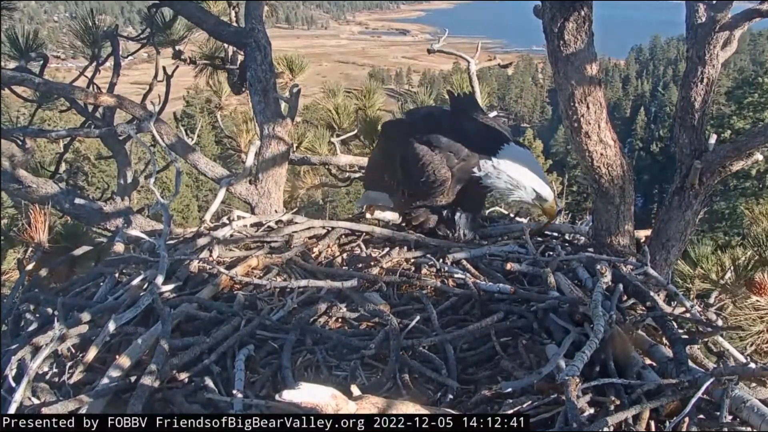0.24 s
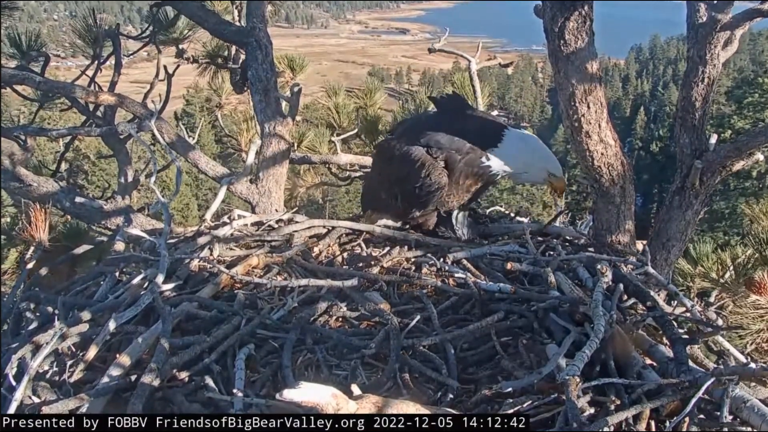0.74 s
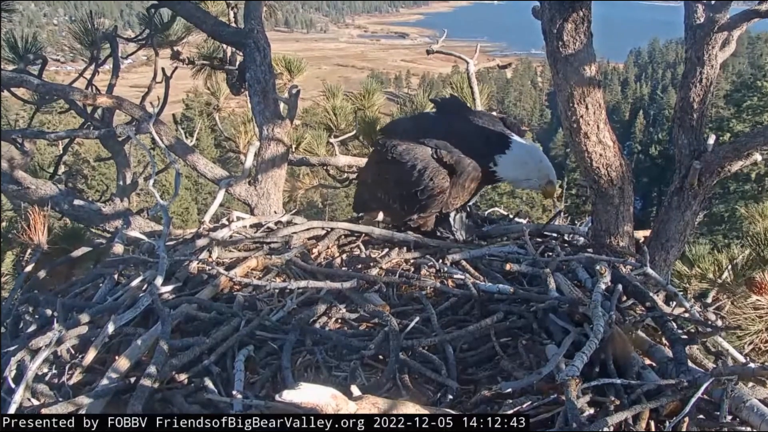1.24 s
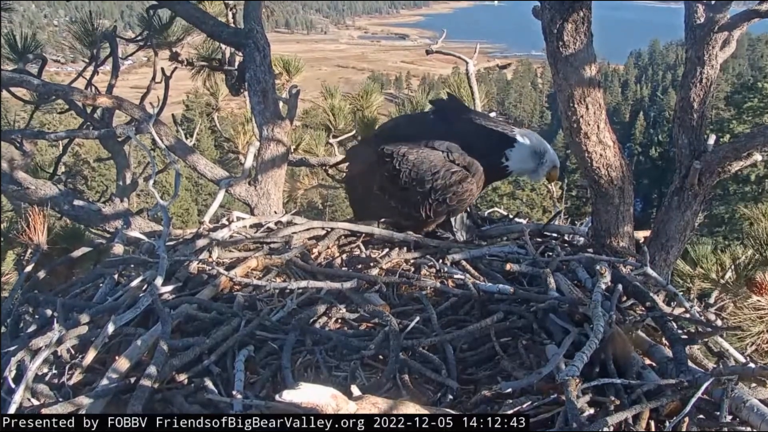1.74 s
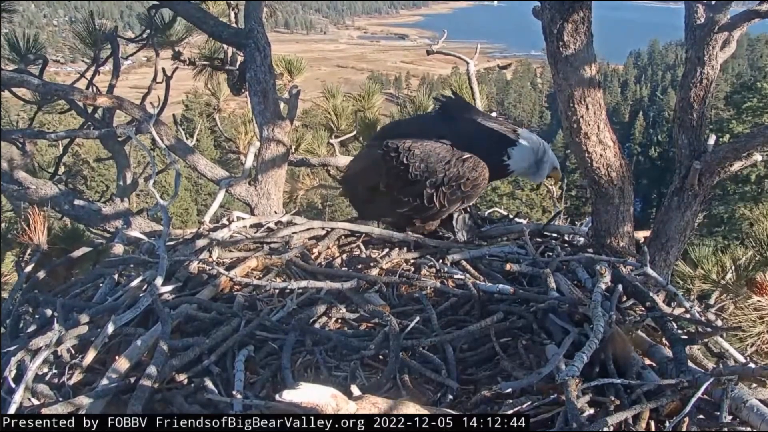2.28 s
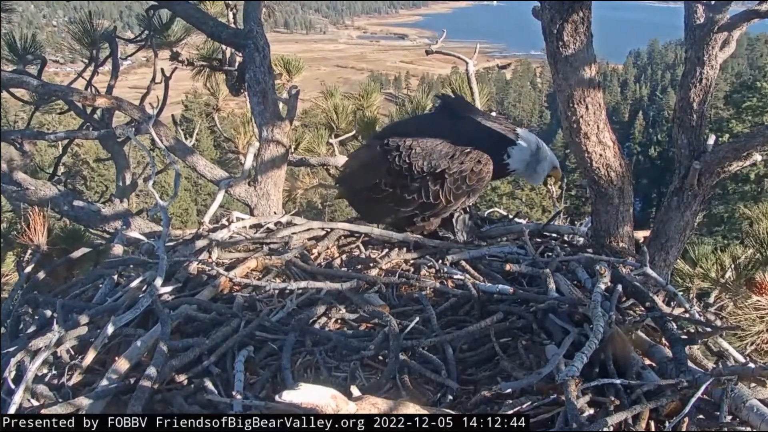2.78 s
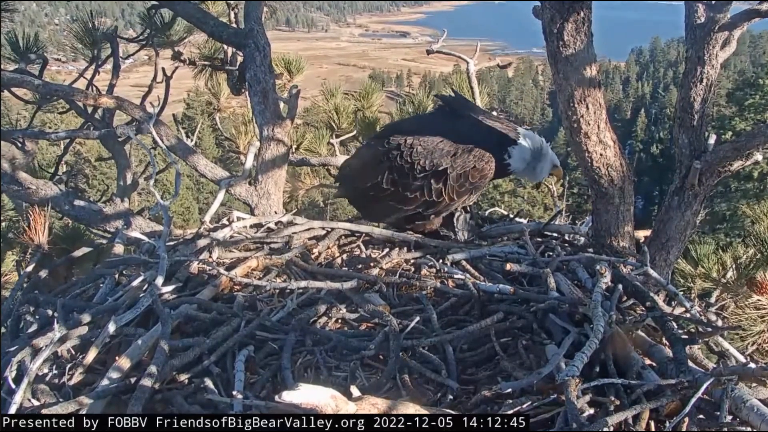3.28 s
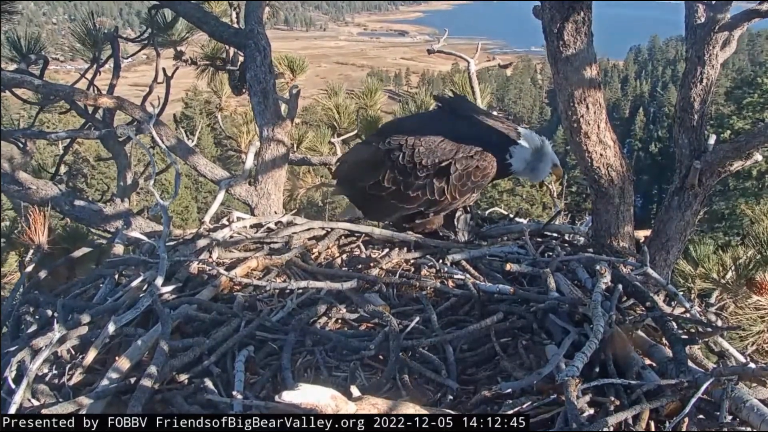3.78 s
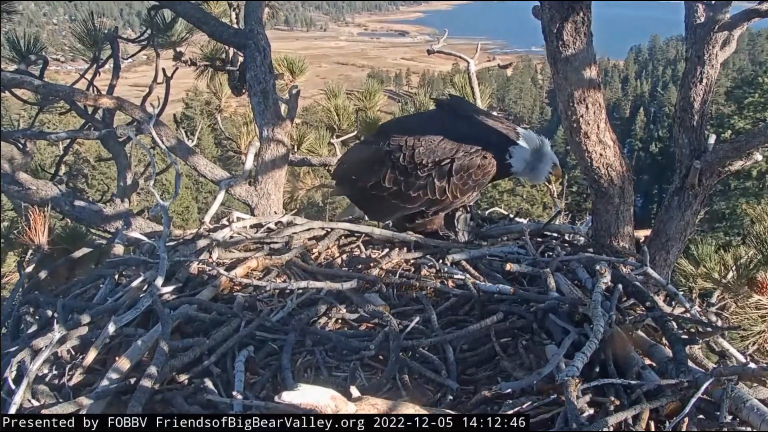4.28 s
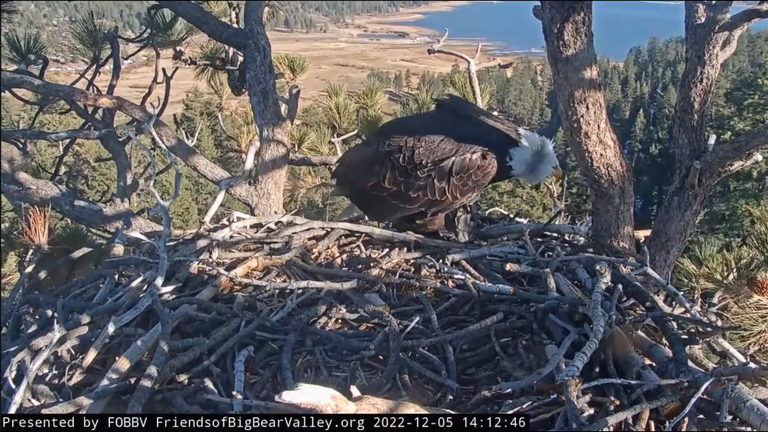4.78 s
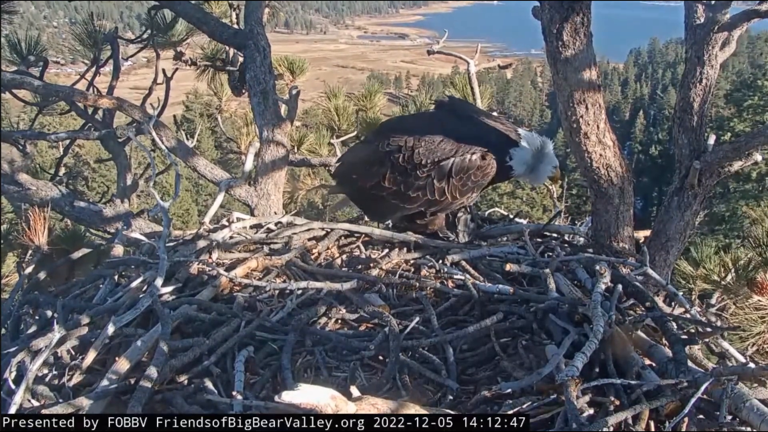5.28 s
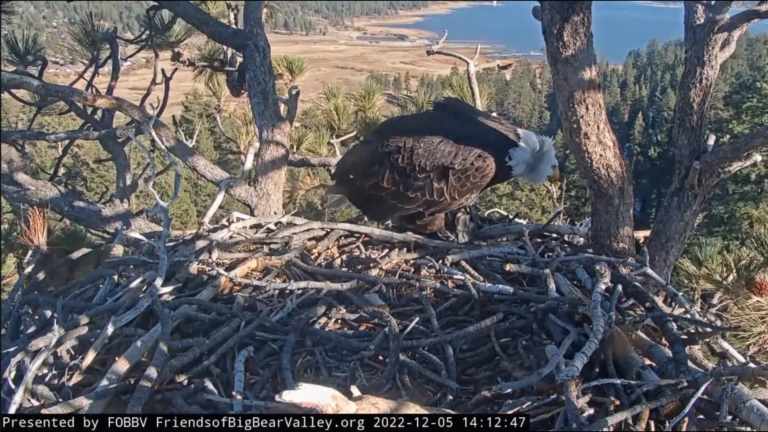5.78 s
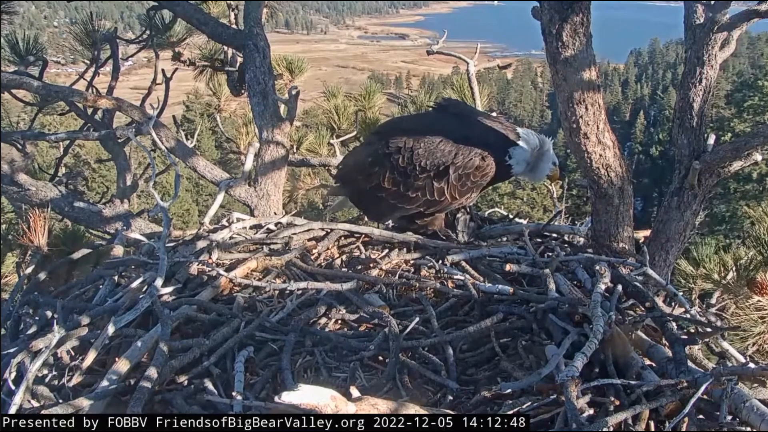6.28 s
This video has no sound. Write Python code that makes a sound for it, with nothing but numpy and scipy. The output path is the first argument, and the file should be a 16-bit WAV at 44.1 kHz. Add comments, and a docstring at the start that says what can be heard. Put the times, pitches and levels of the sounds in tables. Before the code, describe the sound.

A close mono outdoor pickup of an eagle on its nest of dry sticks, with even breeze hiss and soft low wind rumble throughout. From about 0.2 to 0.5 seconds a thin hoarse whistle rises and falls, catching into brief bright peals. Two faint twig ticks come near 0.75. More chirps follow at 1.0, 1.5, 1.9 and 2.15 seconds, arching high, with loud, nearly pure, piercing peals. At 2.2 a low reedy croak buzzes for a third of a second and opens into the first scream at 2.5, roughened by squeals. Further screams come at 3.2, 3.9 and 4.65, each about 0.3 seconds, introduced by a short croak, climbing slightly, then cracking to half its pitch. Loud calls overload slightly and echo among the trees. After 5 seconds the echo fades; light twig clicks and rustling increase between 5.3 and 6.5.

```python
"""Thin whistled chirps over a light breeze, some catching into loud peals: an eagle on its nest in a tall pine.
Four screams follow, each opening on a low croak and cracking to half its pitch at the end.
The voice is a rough, phase-shaken stack of harmonics; sparse and dense reflections make the forest's echo.
Breeze is shaped noise, nest twigs are struck resonances, and the close mono microphone overloads on the calls."""
import sys
import numpy as np
from scipy import signal
from scipy.fft import rfft, irfft, next_fast_len
from scipy.io import wavfile
from scipy.ndimage import uniform_filter1d

SR = 44100
rng = np.random.default_rng(int(sys.argv[2]) if len(sys.argv) > 2 else 0)


def wrap_up_sound(samples):
    """Save the sound to the file named by the first command line argument, as 16-bit audio."""
    columns = np.atleast_2d(samples).T
    # keep every value between -1 and 1, then stretch to whole-number steps
    tamed = np.clip(columns, -1, 1)
    steps = np.round(tamed * 32767).astype(np.int16)
    wavfile.write(sys.argv[1], SR, steps)


N = 288149
TIME = np.arange(N) / SR

# Screams: t/s, length/s, first f/Hz, last f/Hz, lateness of the climb (power), level/dB, crack level/dB;
# pitch before the final lift, levels before the tone of the voice
SCREAMS = [(2.524, .24, 1806, 1963, 1.53, -1, -23.5), (3.184, .251, 1793, 1966, 1.24, -0.5, -4),
           (3.9, .304, 1806, 1958, 1.65, -0.5, -9.5), (4.649, 0.31, 1798, 1978, 1.214, -1.5, -2)]
# How well a scream's fundamental, then its octave, carries: f/Hz, level/dB
FUNDAMENTAL_CARRY = [(1790, -11), (1810, -7), (1835, -0.5), (1875, -16), (1905, 6), (1945, 4.5),
                     (2000, 11.5)]
OCTAVE_CARRY = [(3580, -13.5), (3630, -15), (3660, 1), (3760, -4.5), (3815, 1), (3880, -5.5), (3970, 2.5)]
# Last upward push before a scream cracks
SCREAM_LIFT_HZ, SCREAM_LIFT_S = 20, 0.016

# Squeals from the other side of the syrinx, beating against a scream:
# t/s, length/s, first f/Hz, middle f/Hz, last f/Hz, level/dB before tone
SQUEALS = [(2.563, 0.034, 3980, 3900, 3837, -6.5), (2.664, 0.025, 3400, 3300, 3284, -8),
           (2.697, .016, 4000, 3660, 3620, -6.5)]
# Squeal harmonics: number, level/dB
SQUEAL_TONE = [(1, -2.5), (2, -48)]

# Crack harmonics: number, level/dB
CRACK_TONE = [(1, -60), (2, -17), (3, 0.5), (4, -25.5), (5, -34), (6, -17)]
# A crack holds near half the scream's pitch, sagging slightly, then sinks and fades
CRACK_HOLD_S, CRACK_SINK_S = 0.028, 0.029
CRACK_SAG_HZ_PER_S, CRACK_SINK_HZ, CRACK_FADE_DB = 400, 94.9, -23.5

# Croaks: t/s, length/s, first f/Hz, middle f/Hz, last f/Hz, level/dB; before the sag and the throat
CROAKS = [(2.18, .352, 1166, 1214, 1282, -10), (3.026, .025, 1285, 1250, 1181, -19),
          (3.092, .1, 1212, 1255, 1282, -14), (3.814, .093, 1248, 1275, 1270, -12),
          (4.583, .073, 1245, 1274, 1264, -12)]
# Throat resonances during a croak: f/Hz, level/dB
CROAK_THROAT = [(1180, -11), (1280, -4), (2360, -5), (2460, -2.5), (2560, -6), (3550, -10), (3700, -4.5),
                (3850, -9), (4800, -25), (5100, -27.5), (6050, -33), (6400, -38.5), (7400, -46.5),
                (8700, -64.5)]
CROAK_SCOOP_HZ = 25  # the pitch sags at both ends of a croak

# Loud pure peals, where a chirp catches on the throat:
# t/s, length/s, first f/Hz, middle f/Hz, last f/Hz, level/dB before tone
PEALS = [(.204, .015, 3230, 3420, 3370, -11), (.432, 0.029, 3860, 3600, 3506, 2),
         (.459, .012, 3500, 3680, 3480, -7), (1.04, 0.091, 3590, 3990, 3730, 1),
         (1.486, 0.016, 3540, 3610, 3820, -6.5), (1.523, 0.06, 3820, 4040, 4187, 2.5),
         (1.618, 0.0098, 4000, 3700, 3690, 0.5), (1.632, 0.0094, 3700, 3740, 3560, -4.5),
         (1.909, .02, 3590, 3690, 3937, 0.5), (1.94, 0.032, 4200, 4060, 4187, 1),
         (2.028, 0.015, 3880, 3840, 3760, -1.5), (2.166, 0.055, 3150, 3320, 3170, 5)]
# Peal harmonics: number, level/dB
PEAL_TONE = [(1, -1.5), (2, -24.5), (3, -59.5)]

# Chirps, thin whistled arches: t/s, rise/s, hold/s, fall/s, top f/Hz,
# slope level/dB, top level/dB, overtone level/dB; levels before the tone of the voice
CHIRPS = [ (0.184, .212, .028, .055, 5050, -20, -32, -26), (.99, 0.048, 0.082, .033, 4097, -17, -13, -28.5),
          (1.487, .091, .025, 0.039, 5180, -22, -20.5, -50),
          (1.907, .068, 0.036, 0.044, 5270, -20, -13.5, -54),
          (2.155, 0.0072, 0.02, .055, 3754, -12.5, -4, -34.5)]
CHIRP_FIRST_HZ, CHIRP_LAST_HZ = 3480, 3165
# A rising chirp is hoarse up to this pitch, at this share of the rise, then clears
CHIRP_BREAK_HZ, CHIRP_BREAK_SHARE = 4550, 0.75

# Soft creaks as the voice starts or stops: t/s, length/s, first f/Hz, last f/Hz, level/dB before tone
CREAKS = [(0.169, 0.031, 1800, 1960, -23), (.987, 0.019, 1895, 2013, -25),
          (1.476, 0.014, 1938, 2090, -25.5), (1.899, 0.013, 1972, 2157, -26),
          (2.14, 0.02, 1805, 2096, -25.5), (2.769, 0.032, 1913, 1629, -16),
          (3.494, 0.0083, 1777, 1567, -18.5), (4.249, 0.016, 1812, 1563, -20.5),
          (5.015, 0.013, 1807, 1593, -17)]
# Creak harmonics: number, level/dB
CREAK_TONE = [(1, -2.5), (2, -7), (3, -27.5), (4, -44)]

# Reflections from the nest and the trunks: delay t/s, level/dB
REFLECTIONS = [(.0043, -40), (.0091, -22.5), (0.015, -15.5)]
# Scatter from the forest all around, relative colour: f/Hz, level/dB
ECHO_COLOUR = [(1000, -7), (2000, -6.5), (3000, 5.5), (3800, 2.5), (5200, -4), (8000, -11.5),
               (12000, -26.5)]
# Its relative course: t after the call/s, level/dB
ECHO_COURSE = [(.01, 24), (.06, 2), (.14, -8.5), (.27, -8.5), (.4, -6.5), (.55, -17.5), (.8, -27),
               (1.3, -70.5)]
# Brighter answer of a far stand of trees, relative colour: f/Hz, level/dB
FAR_COLOUR = [(1000, -36), (2000, -9), (3000, -1), (3900, 5.5), (5200, 8), (6000, -12), (8000, -8),
              (11000, -9)]
# Its relative course: t after the call/s, level/dB
FAR_COURSE = [(.15, -62), (.21, -9.5), (0.239, -4), (.27, -15.5), (.3, -6.5), (.38, -54)]
ECHO_DB, FAR_DB = -24, -34

# Twig ticks: t/s, strength of the burst level/dB, before TWIG_DB and the resonances
TWIGS = [(0.7264, -29), (0.795, -25.5), (5.1219, -42), (5.2976, -19), (5.678, -22.5), (5.741, -21.5),
         (5.7794, -33), (6.1965, -18), (6.2398, -19), (6.3836, -26)]
# Twig resonances: f/Hz, level/dB, 60 dB decay t/s
TWIG_MODES = [(3180, 2.5, 0.0091), (3830, 3.5, 0.011), (4640, -0.5, 0.013), (5400, -4.5, 0.0069),
              (6440, -4, 0.0042), (7500, -10, 0.0059), (9200, -12.5, 0.003)]
# Faint rustle as the bird shifts its feet: t/s, ticks per second
RUSTLE = [(0, 3), (.6, 6.9), (1, 3), (5.6, 2.5), (5.8, 22), (6.4, 31), (6.53, 8)]
TWIG_DB = -6

# Breeze hiss in the pines, relative spectrum: f/Hz, level/dB
AIR = [(120, -27.5), (200, -4.5), (534, -6), (702, -5), (1170, -7.5), (1330, -10), (1950, -18),
       (3420, -13.5), (3820, -11.5), (4180, -21), (5300, -33.5), (5800, -37), (7090, -41), (13400, -48.5),
       (15500, -64.5)]
# Breeze rumble on the microphone, relative spectrum: f/Hz, level/dB
RUMBLE = [(12, -22), (20, -1.5), (37, -4), (60, -7.5), (89, -7.5), (134, -13), (331, -31), (400, -38.5),
          (520, -48), (880, -120)]
# Breeze strength: t/s, rumble level/dB, hiss level/dB
BREEZE = [(0, -23, -32.5), (.9, -24, -32.5), (2.1, -23.5, -35), (3, -26.5, -36), (4.5, -24.5, -36.5),
          (5.4, -24, -36), (6.53, -25, -39)]

# Tone of the recorder after its preamplifier: f/Hz, level/dB
RECORDER_TONE = [(1000, -3.5), (4000, -2), (6000, 2), (8000, 3.5), (11000, 4), (12500, 3.5), (14000, -3),
                 (15500, -14.5)]
OVERLOAD, CUTOFF_HZ = 0.59, 15600  # overload ceiling as an amplitude


def eagle():
    """All registers of the bird's voice, summed."""
    return screams() + squeals() + cracks() + croaks() + peals() + chirps() + creaks()


def screams(upper_db=-24, onset_rough=0.15, squeal_rough=0.44):
    """A climbing pitch shifts the weight between fundamental and octave; onset and squeals are rough."""
    share, inside, (first, last, lateness, db, crack_db) = notes(SCREAMS)
    lift = SCREAM_LIFT_HZ * share * unsettled(inside, SCREAM_LIFT_S)
    pitch = first + (last - first) * share ** lateness + lift
    first_db = np.interp(pitch, *np.transpose(FUNDAMENTAL_CARRY))
    octave_db = np.interp(2 * pitch, *np.transpose(OCTAVE_CARRY))
    partials = [first_db, octave_db, first_db + upper_db, octave_db + upper_db]
    _, inside_squeal, _ = notes(SQUEALS)
    rough = onset_rough * (1 - share) * unsettled(inside, settle_s=0.0057)
    rough = rough + squeal_rough * gate(inside_squeal, edge_s=0.022)
    level = np.sqrt(2) * gate(inside, edge_s=0.0082) * from_db(db)
    return level * syrinx(pitch, partials, rough, jitter=0.001, rasp=0.085, rasp_hz=427.7, hiss_db=-29)


def squeals(rough=0.35):
    """A second, hoarse vibration sounds along with the first scream and beats against it."""
    share, inside, (first, middle, last, db) = notes(SQUEALS)
    pitch = bow(share, first, middle, last)
    level = from_db(db) * gate(inside, edge_s=0.0036)
    return voice(pitch, level, SQUEAL_TONE, rough, jitter=0.0021, rasp=0.27, rasp_hz=500, hiss_db=-34.5)


def cracks(core_rough=0.022, edge_rough=0.21, fade_power=0.46):
    """Each scream ends by breaking to half its pitch, then sinks and fades."""
    length = CRACK_HOLD_S + CRACK_SINK_S
    rows = [(s + held, length, last, db) for s, held, first, last, *_, db in SCREAMS]
    share, inside, (top_hz, db) = notes(rows)
    elapsed_s = share * length
    sunk = np.clip((elapsed_s - CRACK_HOLD_S) / CRACK_SINK_S, 0, 1)
    pitch = top_hz / 2 - CRACK_SAG_HZ_PER_S * elapsed_s - CRACK_SINK_HZ * sunk
    level = from_db(db + CRACK_FADE_DB * sunk ** fade_power) * gate(inside, edge_s=0.0052) ** 2
    rough = core_rough + edge_rough * unsettled(inside, settle_s=0.005)
    return voice(pitch, level, CRACK_TONE, rough, jitter=0.0045, rasp=0.08, rasp_hz=350, hiss_db=-28.5)


def croaks(waver_db=0.74, core_rough=0.045, edge_rough=0.74):
    """Harmonics of a low, reedy buzz slide through the throat resonances; the higher ones waver most."""
    share, inside, (first, middle, last, db) = notes(CROAKS)
    pitch = bow(share, first, middle, last) - CROAK_SCOOP_HZ * unsettled(inside, settle_s=0.006)
    rough = core_rough + edge_rough * unsettled(inside, settle_s=0.0065)
    partials = []
    for k in range(1, 8):
        throat_db = np.interp(k * pitch, *np.transpose(CROAK_THROAT))
        partials.append(throat_db + waver_db * k * flutter(4.3, 22))
    level = np.sqrt(2) * gate(inside, edge_s=0.011) * from_db(db)
    return level * syrinx(pitch, partials, rough, jitter=0.00206, rasp=0.33, rasp_hz=548, hiss_db=-33.5)


def peals(core_rough=0.03, edge_rough=0.3, edge_db=-4, waver_db=1.6):
    """Loud, nearly pure vibration, softer and rougher as it catches and lets go."""
    share, inside, (first, middle, last, db) = notes(PEALS)
    pitch = bow(share, first, middle, last)
    level_db = db + edge_db * unsettled(inside, settle_s=0.0059) + waver_db * flutter(20, 90)
    level = from_db(level_db) * gate(inside, edge_s=0.0068)
    rough = core_rough + edge_rough * unsettled(inside, settle_s=0.0072)
    return voice(pitch, level, PEAL_TONE, rough, jitter=0.003, rasp=0.2, rasp_hz=550, hiss_db=-30.5)


def chirps(slope_rough=0.49, top_rough=0.037, end_db=-7, flicker_db=5, rasp_db=-1.0,
           low_hz=2900, high_hz=4100):
    """The whistle rises, holds and falls; turbulence on its rough, unsteady slopes also rings the throat."""
    points = []  # t/s, f/Hz, level/dB, roughness
    rows = []
    for s, rise, hold, fall, top_hz, slope_db, top_db, overtone_db in CHIRPS:
        top_s = s + rise
        fall_s = top_s + hold
        early_hz = (2 * CHIRP_FIRST_HZ + top_hz) / 3
        break_hz = min(CHIRP_BREAK_HZ, top_hz)
        falling_hz = (CHIRP_LAST_HZ + top_hz) / 2
        points += [(s, CHIRP_FIRST_HZ, slope_db + end_db, slope_rough),
                   (s + rise / 3, early_hz, slope_db, slope_rough),
                   (s + rise * CHIRP_BREAK_SHARE, break_hz, slope_db, slope_rough),
                   (top_s, top_hz, top_db, top_rough),
                   (fall_s, top_hz, top_db, top_rough),
                   (fall_s + fall / 2, falling_hz, slope_db, slope_rough),
                   (fall_s + fall, CHIRP_LAST_HZ, slope_db + end_db, slope_rough)]
        rows.append((s, rise + hold + fall, overtone_db))
    pitch, level_db, rough = in_time(points)
    _, inside, (overtone_db,) = notes(rows)
    level = gate(inside, edge_s=0.005) * from_db(level_db + flicker_db * rough * flutter(20, 120))
    tone = [(1, -2.9), (2, overtone_db)]
    whistle = voice(pitch, level, tone, rough, jitter=0.024 * rough, rasp=0.16, rasp_hz=430, hiss_db=-38)
    throat = signal.butter(2, [low_hz, high_hz], "band", fs=SR, output="sos")
    turbulence = rms_one(signal.sosfilt(throat, flutter(low_hz, high_hz)))
    return whistle + level * rough * from_db(rasp_db) * turbulence


def creaks(rough=0.42):
    """Short rough glides as the vibration starts or stops."""
    share, inside, (first, last, db) = notes(CREAKS)
    pitch = first + (last - first) * share
    level = from_db(db) * gate(inside, edge_s=0.015)
    return voice(pitch, level, CREAK_TONE, rough, jitter=0.0044, rasp=0.19, rasp_hz=609, hiss_db=-21.0)


def voice(pitch, level, tone, rough, jitter, rasp, rasp_hz, hiss_db):
    """One register of the syrinx, with its balance of harmonics given by a tone table."""
    partials = [db for k, db in tone]
    return np.sqrt(2) * level * syrinx(pitch, partials, rough, jitter, rasp, rasp_hz, hiss_db)


def syrinx(pitch, partials, rough, jitter, rasp, rasp_hz, hiss_db):
    """A vibrating membrane; when rough, fast irregular flapping shakes its phase and its strength."""
    pitch = uniform_filter1d(pitch, SR // 250)  # glides smoothed over 4 ms
    phase = 2 * np.pi * np.cumsum(pitch * (1 + jitter * flutter(14, 140))) / SR
    phase = phase + rasp * rough * flutter(rasp_hz / 0.89, rasp_hz * 1.127)
    tone = sum(from_db(db) * np.sin(k * phase) for k, db in enumerate(partials, start=1))
    flapping = 0.5 * rough * flutter(rasp_hz / 2, rasp_hz * 1.09)
    breath = from_db(hiss_db) * flutter(100, 2700)
    return tone * (1 + flapping + breath)


def forest(call):
    """Close wood answers at once, the forest rings on, and far trees answer after a quarter second."""
    near = sum(from_db(db) * np.interp(TIME - delay, TIME, call, left=0) for delay, db in REFLECTIONS)
    around = from_db(ECHO_DB) * echo(call, ECHO_COLOUR, ECHO_COURSE)
    far = from_db(FAR_DB) * echo(call, FAR_COLOUR, FAR_COURSE)
    return near + around + far


def echo(call, colour, course):
    """Dense reflections as a burst of shaped noise of unit energy, convolved with the call."""
    strength = from_db(np.interp(TIME, *np.transpose(course), left=-120, right=-120))
    scatter = (noise(colour) * strength)[:3 * SR // 2]
    return signal.fftconvolve(call, scatter / np.linalg.norm(scatter))[:N]


def twigs(crunch_s=0.0013, rustle_db=-38, dull_hz=9000):
    """Each tick is a tiny burst of slips that rings the dry wood; faint single slips come at random."""
    slipping = rng.random(N) < in_time(RUSTLE)[0] / SR
    slips = slipping * from_db(rustle_db + TWIG_DB + rng.uniform(-14, 4.5, N))
    for s, db in TWIGS:
        burst = rng.standard_normal(400) * np.exp(-TIME[:400] / crunch_s)
        start = int(s * SR)
        slips[start:start + len(burst)] += from_db(db + TWIG_DB) * burst / np.linalg.norm(burst)
    ringing = 0
    for k, (hz, db, t60) in enumerate(TWIG_MODES):
        r = from_db(-60 / (t60 * SR))  # decay per sample
        w = 2 * np.pi * hz / SR
        mode = signal.lfilter([0, np.sin(w)], [1, -2 * r * np.cos(w), r * r], slips + 1e-18)
        ringing = ringing + (-1) ** k * from_db(db) * mode  # alternating polarity
    return signal.sosfilt(signal.butter(2, dull_hz, fs=SR, output="sos"), ringing)


def breeze():
    """Wind rumble on the microphone and an even hiss from the needles, both as shaped noise."""
    rumble_db, hiss_db = in_time(BREEZE)
    return from_db(rumble_db) * noise(RUMBLE) + from_db(hiss_db) * noise(AIR)


def notes(rows):
    """For (start, length, ...): share of the nearest note passed, seconds inside its nearer end, the rest."""
    rows = np.array(rows)
    borders = (rows[1:, 0] + rows[:-1, 0] + rows[:-1, 1]) / 2  # middle of each gap
    start, length, *columns = rows[np.searchsorted(borders, TIME)].T
    share = np.clip((TIME - start) / length, 0, 1)
    inside_s = np.minimum(TIME - start, start + length - TIME)
    return share, inside_s, columns


def gate(inside_s, edge_s):
    """Opens at the start of a note and closes at its end."""
    return np.clip(inside_s / edge_s + 0.5, 0, 1)


def unsettled(inside_s, settle_s):
    """1 at both ends of a note, dying away towards its middle."""
    return np.exp(-np.maximum(inside_s, 0) / settle_s)


def bow(share, first, middle, last):
    """A parabola through three pitches."""
    return first + (last - first) * share + (2 * middle - first - last) * 2 * share * (1 - share)


def in_time(rows):
    """The columns of a timed table, joined by straight lines."""
    s, *columns = np.transpose(rows)
    return [np.interp(TIME, s, column) for column in columns]


def flutter(low_hz, high_hz):
    """Random motion between two rates, scaled to rms 1."""
    band = signal.butter(2, [low_hz, high_hz], "band", fs=SR, output="sos")
    return rms_one(signal.sosfilt(band, rng.standard_normal(N)))


def noise(spectrum):
    """Noise with the given spectral shape, scaled to rms 1."""
    return rms_one(coloured(rng.standard_normal(N), spectrum))


def coloured(x, spectrum):
    """A signal through a tone curve, interpolated over log frequency."""
    hz, db = np.transpose(spectrum)
    size = next_fast_len(N, real=True)
    bin_hz = np.arange(size // 2 + 1) * SR / size
    gain = from_db(np.interp(np.log(bin_hz + 1), np.log(hz), db))
    return irfft(rfft(x, size) * gain, size)[:N]


def rms_one(x):
    """A signal scaled to rms 1."""
    return x / np.sqrt(np.mean(x ** 2) + 1e-20)


def from_db(db):
    """Decibels to amplitude."""
    return 10 ** (np.asarray(db) / 20)


def scene():
    """The eagle, its echo in the forest, the nest twigs and the breeze, alike on both channels."""
    call = eagle()
    mono = call + forest(call) + twigs() + breeze()
    return np.array([mono, mono])


def record(dry, knee=58.0):
    """The preamplifier flattens loud calls, adding overtones and squeezing the breeze; the top is cut."""
    fine = signal.resample_poly(dry.mean(axis=0), 4, 1)  # oversampled against aliasing
    flat = fine / (1 + np.abs(fine / OVERLOAD) ** knee) ** (1 / knee)
    mono = coloured(signal.resample_poly(flat, 1, 4), RECORDER_TONE)
    # two all-pass filters delay the overtones unequally, so the flat tops turn into peaks
    mono = signal.sosfilt([[-0.45, 1, 0, 1, -0.45, 0]] * 2, mono)
    top_cut = signal.ellip(12, 0.1, 70, CUTOFF_HZ, fs=SR, output="sos")
    mono = signal.sosfilt(top_cut, mono)
    return np.array([mono, mono])


dry = scene()
out = record(dry)
wrap_up_sound(out)
```